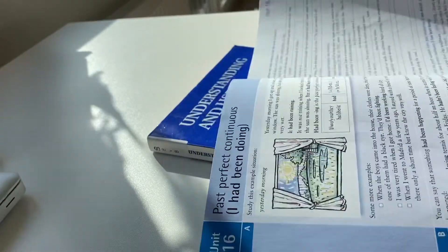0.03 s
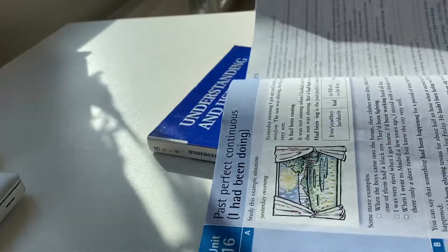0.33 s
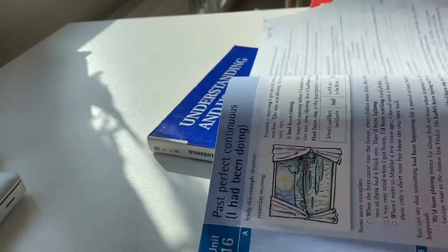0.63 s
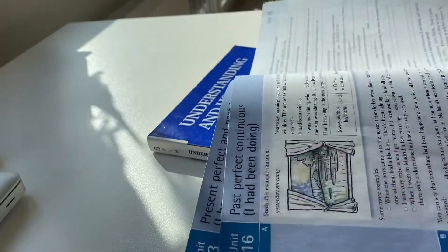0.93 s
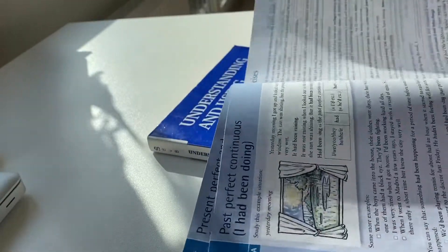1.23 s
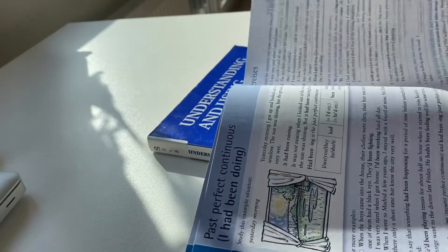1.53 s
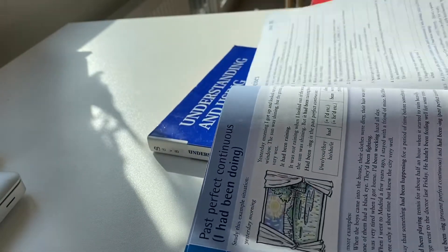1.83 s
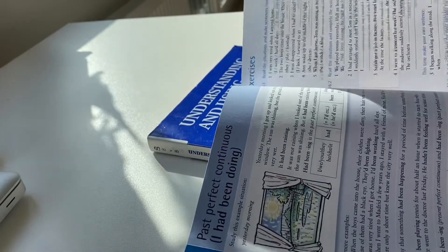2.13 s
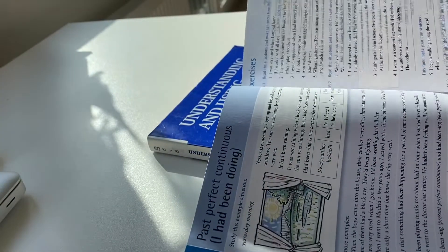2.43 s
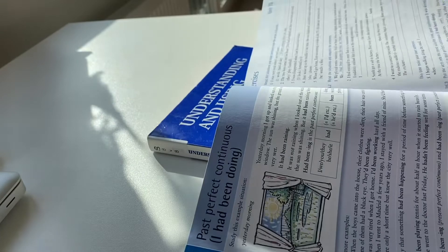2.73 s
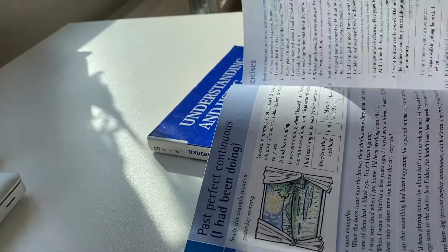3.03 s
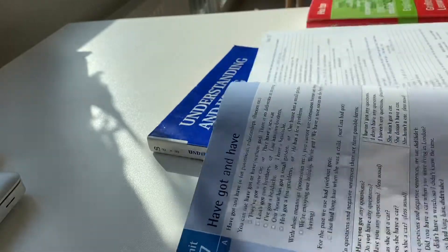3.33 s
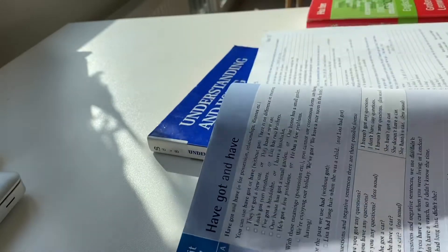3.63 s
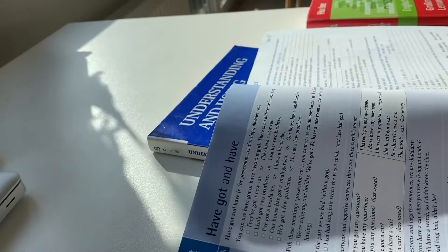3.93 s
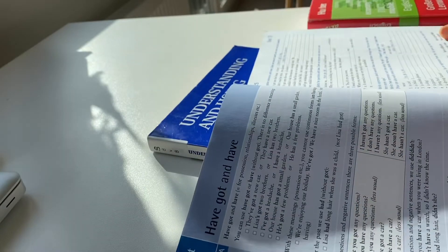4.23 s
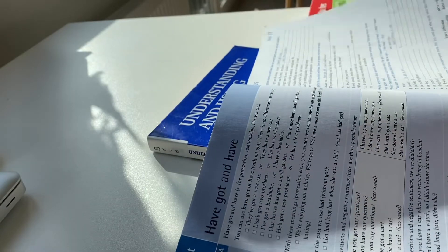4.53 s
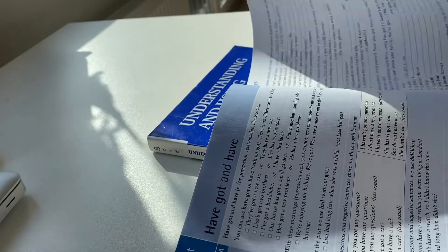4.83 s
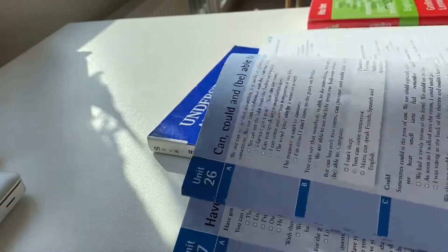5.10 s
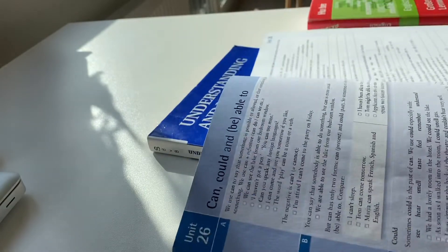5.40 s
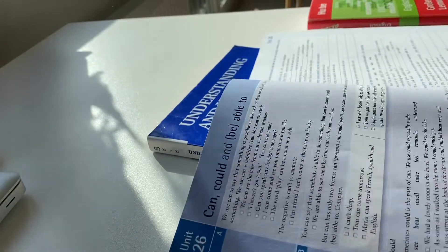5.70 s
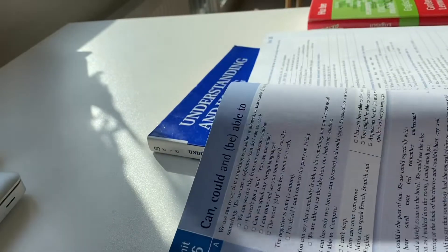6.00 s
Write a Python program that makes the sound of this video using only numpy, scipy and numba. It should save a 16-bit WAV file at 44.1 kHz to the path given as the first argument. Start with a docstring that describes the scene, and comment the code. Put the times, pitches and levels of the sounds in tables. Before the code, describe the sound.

Book pages rustle and crinkle as they are leafed through by hand on a desk, with soft taps and a couple of airy thumps.

```python
"""The pages of a thick paperback rustle as it is leafed through on a desk, close to the microphone.
Sliding paper catches and slips in tiny clicks that blend into a flutter, a rub and a hiss.
Fingers tap the book, sheets buckle and snap against it, and page corners flick off the stack.
The handled book rumbles on the desk, and two page turns fan air over the microphone.
A small room adds a faint echo to the paper, over a quiet background noise."""
import sys
import numpy as np
from scipy import signal
from scipy.fft import rfft, irfft, next_fast_len
from scipy.io import wavfile
from scipy.ndimage import map_coordinates
from numba import njit

SR = 44100
rng = np.random.default_rng(int(sys.argv[2]) if len(sys.argv) > 2 else 0)


def pcm_store(signal):
    """Save signal as 16-bit PCM."""
    levels = np.round(np.clip(np.atleast_2d(signal), -1, 1) * 32767)
    wavfile.write(sys.argv[1], SR, levels.astype(np.int16).T)


N = 267201
TIME = np.arange(N) / SR


def amp(db):
    """Turn decibels into a gain."""
    return 10 ** (np.asarray(db) / 20)


def unit(x):
    """Scale a sound to an average (rms) size of 1."""
    return x / np.sqrt(np.mean(x ** 2) + 1e-20)


def along(points, hz):
    """Read between the rows of a (frequency, value) table, on a log frequency scale."""
    f, values = np.transpose(points)
    return np.interp(np.log(hz + 1), np.log(f + 1), values)


def wobble(rate):
    """A smooth random curve through `rate` points a second."""
    points = rng.standard_normal(int(N * rate / SR) + 4)
    return map_coordinates(points, [TIME * rate])


def filtered(x, response):
    """Turn each frequency f up or down by response(f)."""
    size = next_fast_len(len(x) + 8192)
    return irfft(rfft(x, size) * response(np.fft.rfftfreq(size, 1 / SR)), size)[:len(x)]


def coloured(x, tone):
    """Shape a sound with a tone table, then scale it to size 1."""
    return unit(filtered(x, lambda f: amp(along(tone, f))))


def resonance(f, hz, width):
    """A filter that rings at hz; the narrower it is, the longer it rings."""
    return 1j * f * width / (hz * hz - f * f + 1j * f * width)


def lowpass(f, hz, order):
    """A filter that fades out the treble above hz."""
    return 1 / np.polyval(signal.butter(order, 1, analog=True)[1], 1j * f / hz)


@njit
def gliding_ring(x, hz, loss):
    """Ring at a pitch that moves; more loss gives a shorter ring."""
    out = np.zeros(len(x))
    speed, place = 0., 0.
    for i in range(len(x)):
        turn = np.tan(np.pi * hz[i] / SR)
        out[i] = (speed + turn * (x[i] - place)) / (1 + turn * (turn + loss))
        speed = 2 * out[i] - speed
        place += 2 * turn * out[i]
    return out


def slips(rate, spread_db):
    """Paper fibres slip in random clicks of uneven size, about `rate` a second."""
    hit = rng.random(N) < rate / SR
    size = amp(spread_db * np.minimum(rng.exponential(size=N), 4))
    return unit(hit * size * rng.standard_normal(N))


# Strokes of paper on paper; sliding_paper adjusts the hiss further: (start [s], rise [s], length [s],
# fade from slowing [dB], rub level [dB], flutter over rub [dB], hiss over rub [dB])
STROKES = [(0, 0.0042, 0.104, 11, -64, 2.5, -13), (0.121, 0.054, 0.225, 0.5, -65.5, -1, -13),
           (0.287, 0.125, 0.1283, 3.5, -51.5, 7.5, -9), (0.457, .01, 0.108, -1.5, -76, 4, -13),
           (0.514, 0.051, 0.185, 3, -54, 0, -6.5), (0.666, 0.115, 0.1903, 4, -55, 3, -12),
           (0.877, 0.0167, 0.193, 6, -58.5, 4.5, -10), (1.073, 0.0377, 0.0735, 0, -58, 1.5, -11),
           (1.155, 0.0622, 0.113, 0, -59, 3, -8), (1.289, 0.0274, 0.107, 0.5, -68, 12.5, -7.5),
           (1.406, 0.013, 0.0873, 5.5, -55.5, -2, -12), (1.498, 0.041, 0.129, 1.5, -65, -1, -11.5),
           (1.668, 0.0157, 0.087, -1.5, -58.5, 3, -20), (1.715, 0.0653, 0.3093, 10.5, -57.5, -2, -4.5),
           (2.089, 0.034, 0.227, 0, -67, -7.5, -11), (2.3, 0.116, 0.2416, 10, -62, -2.5, -7.5),
           (2.577, 0.0153, 0.111, 2.5, -63.5, -6, -19), (2.656, 0.0304, 0.239, -1.5, -67, -2, -4.5),
           (2.907, 0.0277, 0.204, 8, -57.5, 13.5, -7), (3.111, 0.0124, 0.1726, 3, -61.5, 2, -12),
           (3.3, 0.075, 0.1544, -2.5, -72, -1, -4.5), (3.507, 0.0703, 0.0653, 2.5, -63.5, 1, 0),
           (3.607, 0.0478, 0.253, 22.5, -59.5, -17, 0.5), (3.891, .07, 0.204, 8, -75.5, 0.5, -6.5),
           (4.283, 0.1313, 0.1508, 4.5, -55.5, -3, -17), (4.416, 0.051, 0.492, 12, -64.5, 1.5, -5.5),
           (4.845, 0.0247, 0.056, -2.5, -64, -2.5, -3.5), (4.917, 0.078, 0.2097, 1.5, -63.5, -1, -5),
           (5.127, 0.154, 0.175, 2.5, -67.5, 6.5, -9), (5.326, 0.034, 0.4, 7.5, -78.5, 15, -18.5),
           (5.611, 0.017, 0.123, 4, -71.5, 18, -9), (5.71, 0.11, 0.092, 11.5, -59.5, -4, -9.5),
           (5.958, 0.0205, 0.12, 7.5, -70, 2.5, -8.5)]

def stroke_levels(stop_db_per_s=192):
    """Each stroke gathers speed, slides and dies away; gives flutter, rub and hiss levels in dB."""
    power = np.full((3, N), 1e-10)
    for start, rise, length, slowing_db, rub_db, flutter_db, hiss_db in STROKES:
        t = TIME - start
        progress = np.clip((t - rise) / max(length - rise, .01), 0, 1)
        speed = np.clip(t / rise, 0, 1) * amp(-slowing_db * progress)
        release = amp(-stop_db_per_s * np.maximum(t - length, 0))
        gains = amp(rub_db + np.array([[flutter_db], [0], [hiss_db]]))
        power += (gains * speed * release) ** 2
    return 10 * np.log10(power)


# The sliding sheet arches over a hollow of air:
# (time [s], hollow pitch [Hz], hollow over sheet [dB], edge hiss pitch [Hz])
SHEET_ARCH = [(0, 1436, -9.5, 5110), (.6, 1162, -2, 7070), (.74, 1356, 12.5, 6280), (.84, 1613, 4.5, 6020),
              (1.06, 1550, -5.5, 6960), (1.18, 1020, 3, 7620), (1.4, 1120, -2.5, 7460),
              (1.82, 1572, -13, 6466), (2.42, 1100, -11.5, 7460), (2.82, 1120, -23, 6690),
              (3.2, 1670, -7, 6360), (3.7, 1530, -10, 7660), (4.42, 1243, 2, 8680),
              (5.02, 1178, -1.5, 7090), (5.4, 1037, 1, 7220), (6.06, 1415, -13, 6630)]
# The four tones of sliding paper, from low to high: (frequency [Hz], relative level [dB])
FLUTTER_TONE = [(70, -38.5), (150, -2), (270, -11), (400, -6), (520, 0), (630, 6.5), (800, 4), (1100, 2.5),
                (1600, 3.5), (2000, -11), (3000, -11), (6000, -39.5), (12000, -80.5)]
RUB_TONE = [(900, 4), (1900, 5), (2800, 5), (4000, 5), (5200, -0.5), (6800, -10.5), (8500, -7.5),
            (12000, -45.5)]
HISS_TONE = [(3000, -9.5), (5000, 1), (6400, 0), (7400, -6), (8500, -3), (9600, -4), (11000, -2),
             (13000, -3.5), (15700, -26)]
FIZZ_TONE = [(6000, -11), (10000, -3.5), (12500, -10), (15700, -17)]

def sliding_paper():
    """Tiny slips shake the sheet and the hollow under it, rub its face and hiss along its edge."""
    flutter_db, rub_db, hiss_db = stroke_levels()
    times, *columns = np.transpose(SHEET_ARCH)
    hollow_hz, hollow_db, edge_hz = [np.interp(TIME, times, column) for column in columns]
    grip_db = 2.23 * wobble(50)  # the sheet catches and lets go
    sheet = coloured(slips(rate=2500, spread_db=2.5), FLUTTER_TONE)
    hollow = slips(rate=3000, spread_db=-1.0)
    for _ in range(2):  # the hollow passes little outside its pitch
        hollow = unit(gliding_ring(hollow, hollow_hz, loss=.36))
    blend = (sheet + amp(hollow_db) * hollow) / np.hypot(1, amp(hollow_db))
    flutter = amp(flutter_db + grip_db) * blend
    rub = amp(rub_db + 1.1 * grip_db) * coloured(slips(rate=8000, spread_db=0), RUB_TONE)
    edge = gliding_ring(slips(rate=14000, spread_db=1.8), edge_hz, loss=.3)
    hiss = amp(hiss_db + 0.874 * grip_db + 3) * coloured(edge, HISS_TONE)
    # fast slips brighten the hiss
    fizz = amp(1.1083 * hiss_db + 1) * coloured(slips(rate=5700, spread_db=2.5), FIZZ_TONE)
    return flutter + rub + hiss + fizz


# Hands push the book: (time of peak [s], strength [dB], time to fade by 60 dB [s])
PUSHES = [(0, -45.5, 10.5), (0.339, -36.5, 0.2), (0.412, -31, 0.225), (0.454, -35, 0.69), (0.558, -39.5, 1),
          (0.914, -39.5, 1.23), (1.339, -44, 0.51), (1.722, -45.5, 4.74), (1.968, -45.5, 1),
          (2.37, -46.5, 0.89), (2.72, -46, 3.18), (2.96, -30, 0.01), (3.0, -29.5, 0.38),
          (3.101, -32.5, 0.77), (3.588, -44, .5), (3.659, -42, 1.8), (3.961, -46.5, 2.32),
          (4.229, -49, 4.9), (4.479, -40, 0.27), (4.561, -36.5, 1.43), (4.865, -33, 0.4149),
          (5.331, -48, 0.06), (5.406, -46, 0.36), (5.65, -39.5, 1.15), (5.8, -40.5, 0.56),
          (5.989, -43, 0.6)]
# The tone of the book rumbling on the desk: (frequency [Hz], relative level [dB])
RUMBLE_TONE = [(5, 10.5), (15, 15.5), (28, 10), (42, -8), (54, -9), (65, 5), (80, -10.5), (120, -13),
               (200, -37.5), (500, -56.5)]

def shifting_book(rise_s=0.0355, typical_rock_hz=58.04, rock_db=-4.5, scuff_db=1, held_db=-57.5):
    """Each push rocks the book on its spine and scuffs the desk; just holding it rumbles faintly."""
    rumble_power = np.full(N, amp(held_db) ** 2)
    rocking = np.zeros(N)
    for peak, db, fade_s in PUSHES:
        t = TIME - peak
        rise = np.sin(np.pi / 2 * np.clip(1 + t / rise_s, 0, 1)) ** 2
        push = rise * amp(db - 60 * np.maximum(t, 0) / fade_s)
        rock_hz = typical_rock_hz * np.exp(0.22 * rng.standard_normal())
        rocking += push * np.sin(2 * np.pi * rock_hz * t)
        rumble_power += (amp(scuff_db) * push) ** 2
    rumble = np.sqrt(rumble_power) * coloured(rng.standard_normal(N), RUMBLE_TONE)
    return amp(rock_db) * rocking + rumble


# The tone of the quiet room: (frequency [Hz], relative level [dB])
BACKGROUND_TONE = [(25, 8), (60, 11.5), (110, -19.5), (200, -2.5), (600, -8), (1500, -11), (3000, -14.5),
                   (6500, -16), (10000, -20), (15500, -25.5)]

def background():
    """A faint, steady noise, strongest in the bass."""
    return amp(-69.5) * coloured(rng.standard_normal(N), BACKGROUND_TONE)


def crinkle(length, rate=750, spread_db=3.5, detune=0.113):
    """Paper gives way in one click or an uneven run; gives their delays, forces and pitch ratios."""
    jitter, size, pitch = rng.standard_normal((3, 64))
    k = np.arange(min(1 + int(length * rate), 64))
    later = k > 0  # only the clicks after the first one vary
    delay = (k + later * np.clip(0.2683 * jitter[k], -.5, .5)) / rate
    force = np.where(later, np.sign(pitch[k - 1]), 1) * amp(later * spread_db * size[k])
    ratio = np.exp(later * detune * pitch[k])
    return np.array([delay, force, ratio])[:, :, None]


# How the cover and the block of pages ring: (pitch [Hz], width [Hz], relative level [dB])
COVER_RINGS = [(597.5, 31.6, 1.5), (642.7, 119.6, 6)]
BOOK_RINGS = [(148.7, 116, 0.5), (202.5, 20, -3.5), (262.9, 44.6, -3), (350.6, 101, -4.5),
              (446.6, 16.5, -4)]
# The tone of the crisp tick at the paper's edge: (frequency [Hz], relative level [dB])
TICK_TONE = [(1800, -26.5), (3000, 3), (4600, -3), (6000, -9.5), (9000, -15.5), (15000, -36.5)]

def paper_hit(start, length, hz, sheet_db, knock_db, thud_db, tick_db, trim_db=-10, knock_trim_db=-2.5):
    """Clicks ring the bent sheet, knock the cover and thud through the book while the edge ticks."""
    size = 3072
    f = np.fft.rfftfreq(size, 1 / SR)
    delay, force, ratio = crinkle(length)
    clicks = force * np.exp(-2j * np.pi * f * delay)
    bass_cut = (1j * f / (700 + 1j * f)) ** 2  # a small patch of paper gives off little bass
    bend = resonance(f, hz * ratio, width=0.676 * hz * ratio)
    top_hz = min(hz * (1.48 + 1.453 * amp(tick_db - sheet_db)), 4600)  # crisper hits ring brighter
    sheet = irfft((clicks * bend).sum(0) * bass_cut * lowpass(f, top_hz, order=5))
    cover, book = [sum(amp(db) * resonance(f, pitch, width) for pitch, width, db in rings)
                   for rings in (COVER_RINGS, BOOK_RINGS)]
    knock = irfft(clicks.sum(0) * cover * bass_cut * lowpass(f, 1370, order=2))
    thud = irfft(clicks.sum(0) * book * lowpass(f, 610, order=3))
    age = np.arange(size) / SR / (0.00065 + 0.41 * length)  # a longer crinkle stretches the tick
    tick = coloured(rng.standard_normal(size) * age * np.exp(-1.5 * age), TICK_TONE)
    paper = amp(sheet_db) * unit(sheet) + amp(tick_db) * tick
    body = amp(knock_db + knock_trim_db) * unit(knock) + amp(thud_db) * unit(thud)
    out = np.zeros(N + size)
    out[round(start * SR):][:size] = amp(trim_db) * (paper + body)
    return out[:N]


# Fingers land on the book, before paper_hit's trims: (time [s], thud level [dB], knock over thud [dB])
TAPS = [(.146, -65.5, 11.5), (.352, -63.5, 19), (.428, -40, -8), (0.4586, -45, -4.5), (.568, -57.5, 7),
        (1.4592, -63, 15.5), (1.932, -50, -0.5), (2.264, -53, -1.5), (2.351, -59, 11), (2.365, -65.5, 13),
        (2.694, -66, 15), (2.713, -54, -0.5), (2.821, -53, -7), (3.556, -62, 11.5), (4.642, -57, 4),
        (4.916, -55, 9.5), (5.9809, -55, 8)]

def finger_taps():
    """A finger knocks the cover and the book, and faintly rings the top sheet."""
    return sum(paper_hit(start, length=.005, hz=1100, sheet_db=db + knock - 22,
                         knock_db=db + knock, thud_db=db, tick_db=db + knock - 19)
               for start, db, knock in TAPS)


# Sheets buckle and land, and at 4.885 s a finger presses the book a little longer; before paper_hit's trims: #
# (time [s], crinkle length [s], sheet pitch [Hz], sheet level [dB], knock over sheet [dB], thud over sheet
# [dB], tick over sheet [dB])
BUCKLES = [(.322, 0.0167, 1290, -57, 10, -8.5, -1.5), (.375, 0.0165, 994, -40.5, 0.5, -8.5, -16),
           (0.3836, 0.00263, 1240, -40.5, 2, -10.5, 0), (0.3879, 0.014, 1400, -52.5, 15.5, 5, 12),
           (.658, 0, 904, -51.5, -3.5, -3, -9), (.913, 0.0129, 1364, -48.5, -2.5, -2.5, -7.5),
           (1.009, 0.0011, 1183, -49.5, -10, -2, -13.5), (1.26, 0.0078, 1380, -45.5, -26, -17, -20),
           (1.316, .0022, 994, -35, -18, -13, -40.5), (1.688, 0.0037, 1090, -48, -4, -5, -11),
           (1.978, 0.0025, 1630, -40.5, -20, -2.5, -41), (2.101, 0.0065, 874, -50, -4.5, 1, -20),
           (2.9197, 0.0033, 1340, -45.5, -5.5, 2, -10.5), (2.9373, 0.0026, 1616, -33, -10, -4.5, -6),
           (2.9452, 0.00276, 1208, -30, -22.5, -4.5, -16), (3.001, 0.00525, 954, -32.5, -10.5, -3, -22.5),
           (3.0025, .004, 3000, -41, -18.5, -20, -17.5), (3.012, 0.0127, 1230, -47, -12, -7, -16.5),
           (3.0956, 0.0038, 1623, -37.5, -27.5, -2.5, -13), (3.104, .008, 1850, -33, -32.5, -8.5, -23),
           (3.139, 0.0168, 1354, -41.5, -13.5, -11.5, -31.5), (3.8746, 0.0017, 974, -57.5, -21, -11, -10.5),
           (4.266, .005, 1190, -59.5, -23, -6.5, -4.5), (4.482, 0.0077, 977, -46, -13, -3, -34),
           (4.527, .014, 888, -50.5, -8, -7, -11), (4.586, 0.0116, 1140, -39, -17, -11, -45.5),
           (4.865, 0.0061, 920, -55.5, -10.5, 7.5, -1), (4.885, 0.0233, 1006, -60.5, 14, 5, 3),
           (5.3219, 0.00127, 1261, -26.5, -13, -29.5, -36.5), (5.6254, 0.0039, 1043, -40.5, -9, -5, -23.5),
           (5.639, 0.0074, 1100, -41, 3.5, -4, -24), (5.658, 0.0095, 1017, -42.5, -13.5, -23.5, -38),
           (5.692, 0.01075, 1260, -33.5, -14.5, -12.5, -28), (5.7412, 0.00037, 1530, -39.5, -0.5, -14, -15),
           (5.809, 0.0026, 1509, -38.5, 6, -6, -10.5)]

def buckling_sheets():
    """A bent sheet gives way and snaps against the block of pages; one row is a longer finger tap on the book."""
    return sum(paper_hit(start, length, hz, db, db + knock, db + thud, db + tick)
               for start, length, hz, db, knock, thud, tick in BUCKLES)


# Pages sweep past the microphone:
# (middle [s], strength [dB], time scale [s], lean from push to suction [-1 to 1])
PAGE_SWEEPS = [(3.143, -16, 0.0613, -0.091), (3.44, -22.5, 0.1117, -0.231), (5.083, -15, 0.04206, 0.352),
               (5.328, -30.5, 0.0804, -0.82)]

def fanned_air():
    """A passing page pushes air ahead of it and leaves suction behind."""
    pressure = np.zeros(N)
    for middle, db, scale_s, lean in PAGE_SWEEPS:
        position = (TIME - middle) / scale_s
        pressure -= amp(db) * (position + lean) * np.exp((1 - position ** 2) / 2)
    return pressure


# Page corners flick, before paper_hit's trim: (time [s], level [dB])
FLICKS = [(3.27, -54), (3.558, -67), (3.584, -74.5), (4.224, -63), (4.234, -69), (5.9815, -62.5)]

def corner_flicks():
    """A corner springs off the stack with one bright click, and no knock or thud."""
    return sum(paper_hit(start, length=0, hz=2900, sheet_db=db,
                         knock_db=-np.inf, thud_db=-np.inf, tick_db=db + 2)
               for start, db in FLICKS)


# How long the room rings: (frequency [Hz], time to fade by 60 dB [s])
ROOM_DECAY = [(150, 0.746), (1200, 0.43), (4000, 0.61), (12000, 0.066)]

def room(x, near_db, tail_db):
    """Nearby surfaces echo at once and the walls add a faint tail; both change as the page moves."""
    out = x.copy()
    step = SR // 4  # a new random echo every quarter of a second
    for start in range(0, N, step):
        hz, t, noise = signal.stft(rng.standard_normal(SR // 2), SR, nperseg=256)
        fade = amp(-60 * t / along(ROOM_DECAY, hz)[:, None])
        tail = signal.istft(noise * fade, SR, nperseg=256)[1]
        age = np.arange(len(tail)) / SR
        tail *= 1 - np.exp(-age / 0.01144)  # the walls' echo takes time to build
        near = rng.standard_normal(len(tail)) * amp(-60 * age / 0.0339) * (age > .002)
        echo = amp(near_db) * near / np.linalg.norm(near) + amp(tail_db) * tail / np.linalg.norm(tail)
        reflected = signal.fftconvolve(x[start:start + step], echo)[:N - start]
        out[start:start + len(reflected)] += reflected
    return out


def scene():
    """The paper with its echo, plus the book's rumble, the background and the fanned air, in mono."""
    paper = sliding_paper() + finger_taps() + buckling_sheets() + corner_flicks()
    paper_in_room = room(paper, near_db=-10.5, tail_db=-18.5)
    return (paper_in_room + shifting_book() + background() + fanned_air())[None]


def record(dry):
    """The recorder keeps nothing above 15750 Hz."""
    return filtered(dry[0], lambda f: f < 15750)[None]


dry = scene()
out = record(dry)
pcm_store(out)
```